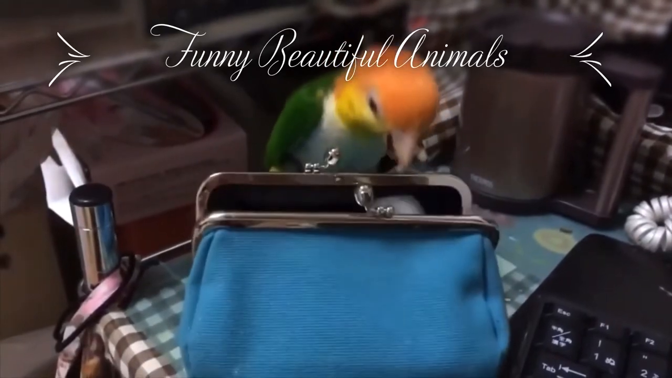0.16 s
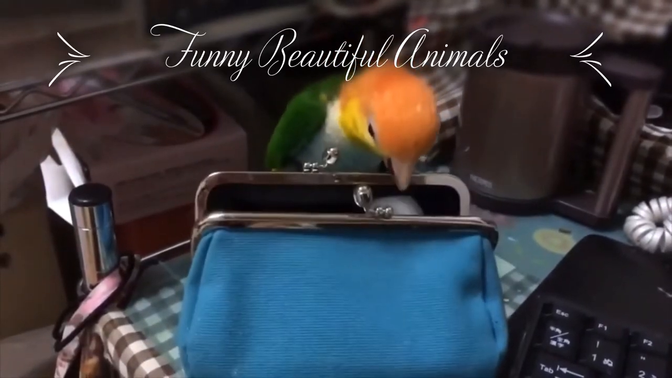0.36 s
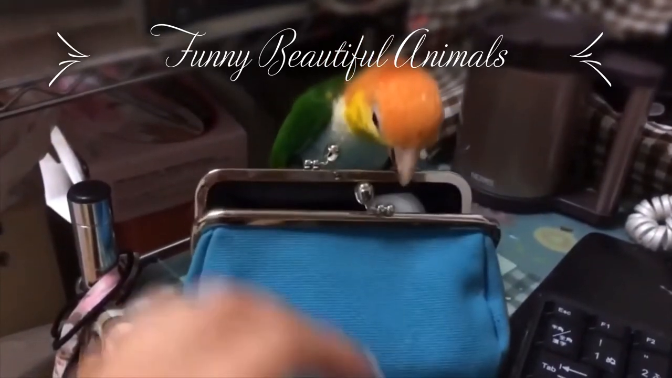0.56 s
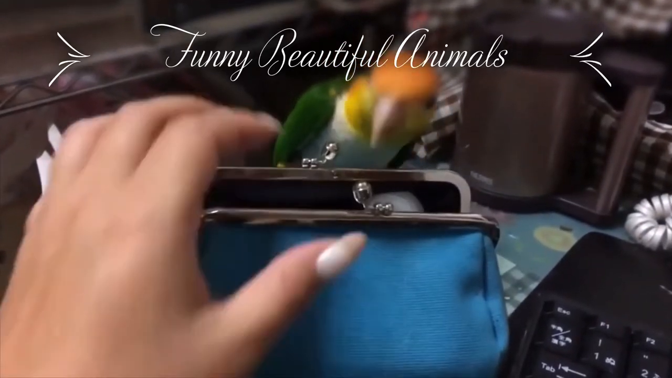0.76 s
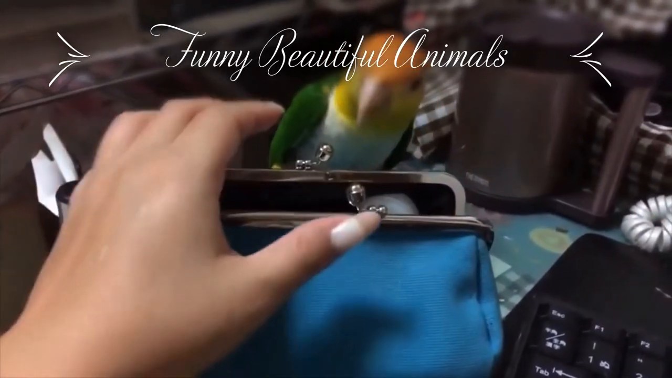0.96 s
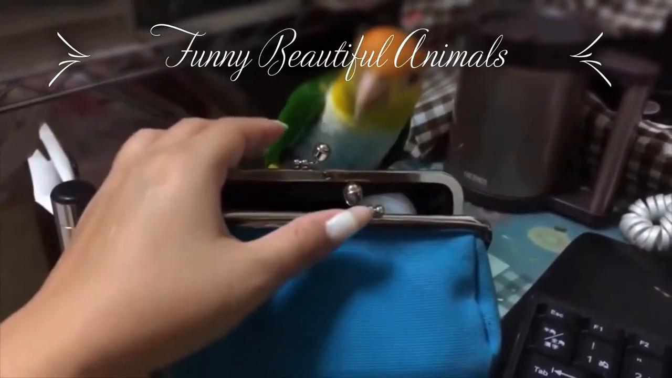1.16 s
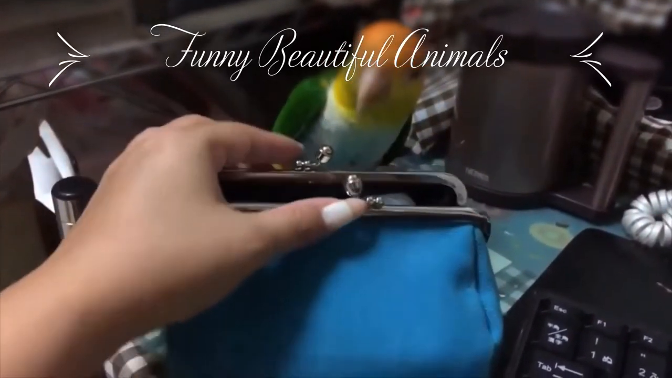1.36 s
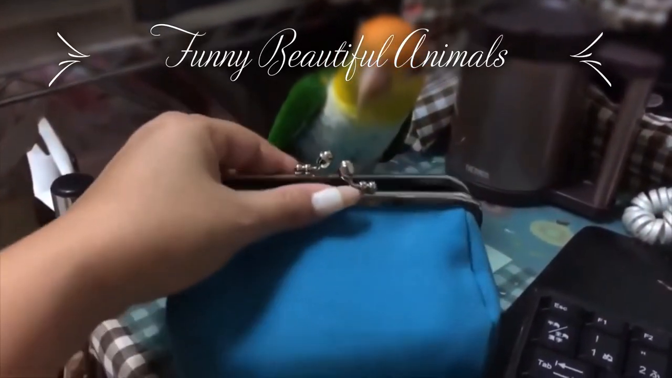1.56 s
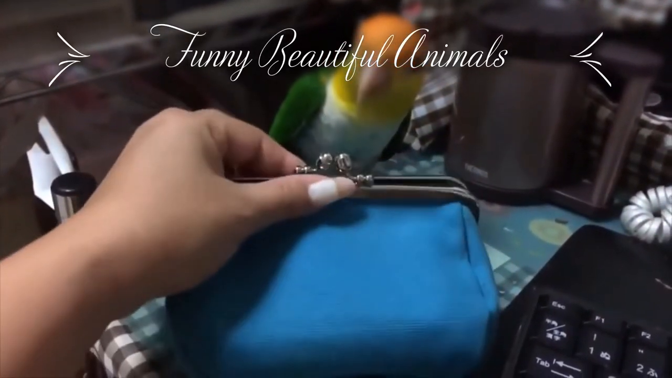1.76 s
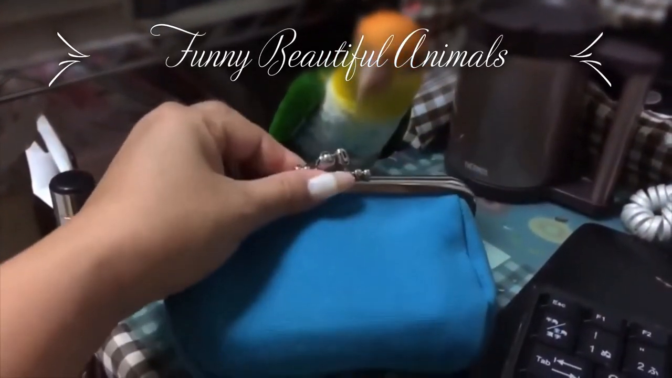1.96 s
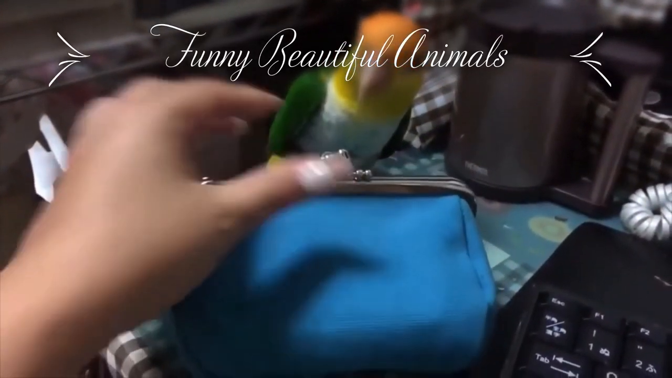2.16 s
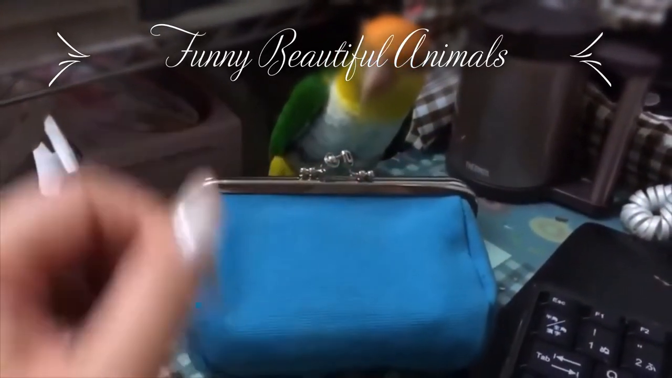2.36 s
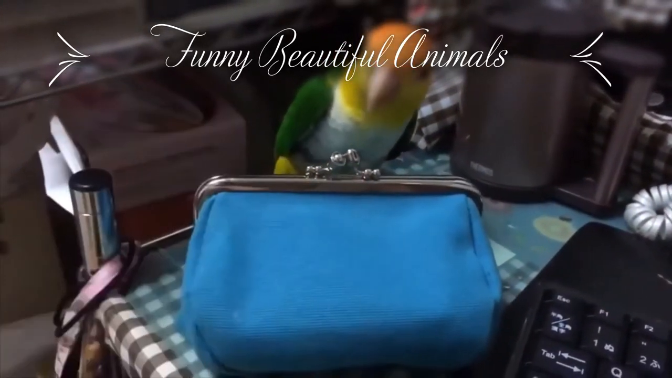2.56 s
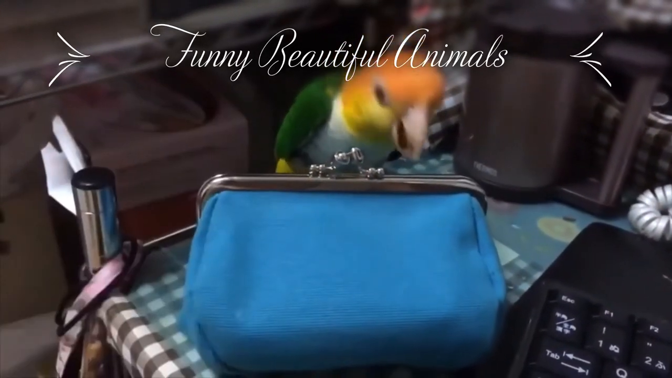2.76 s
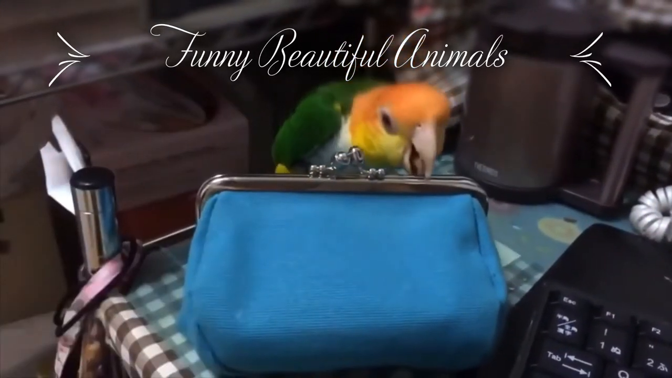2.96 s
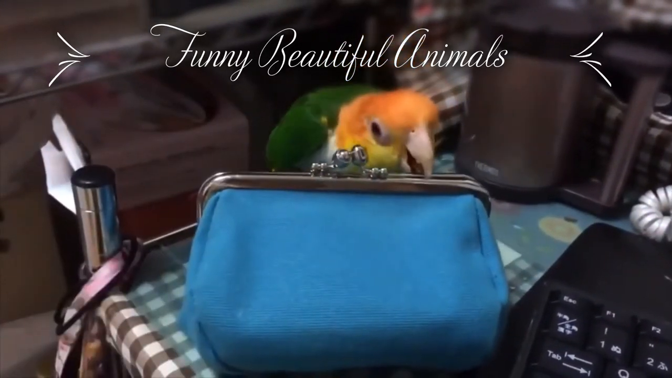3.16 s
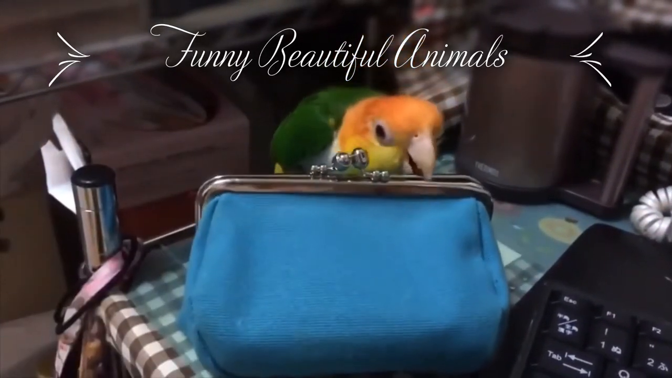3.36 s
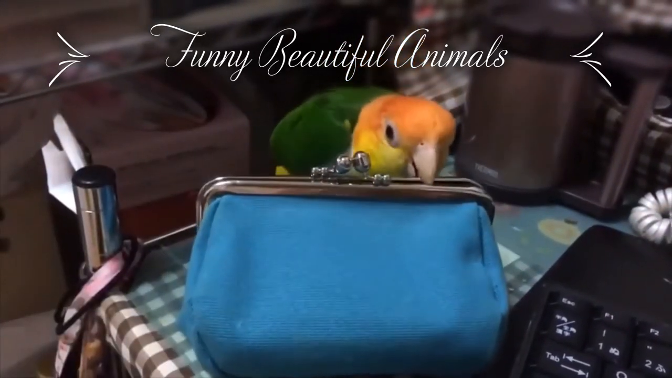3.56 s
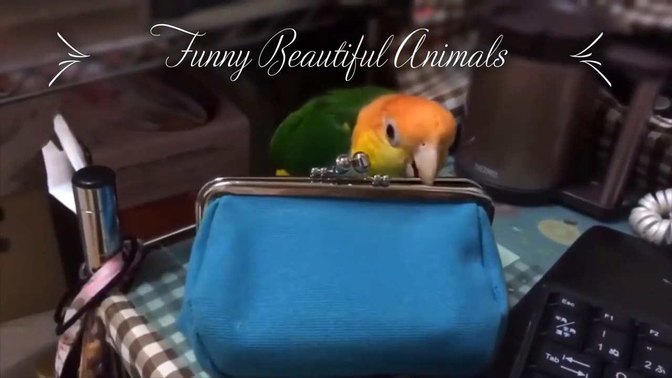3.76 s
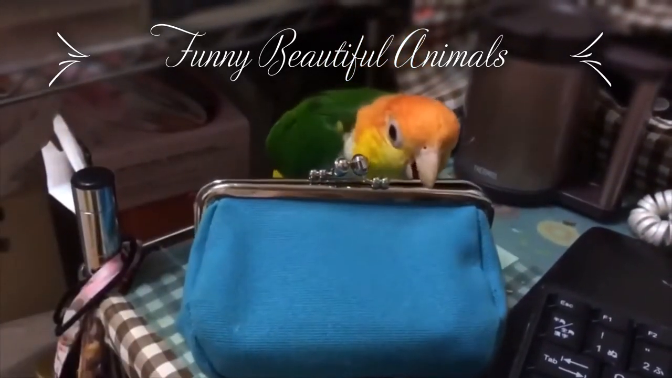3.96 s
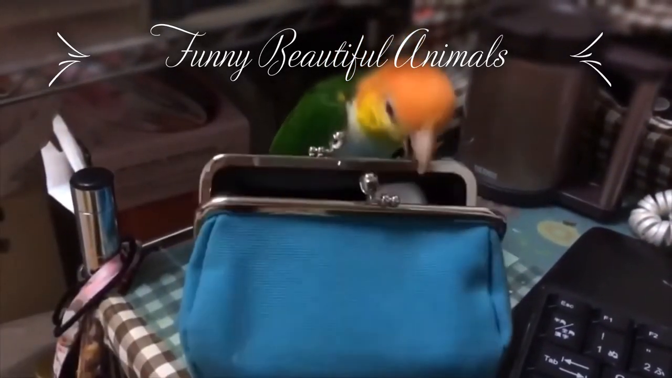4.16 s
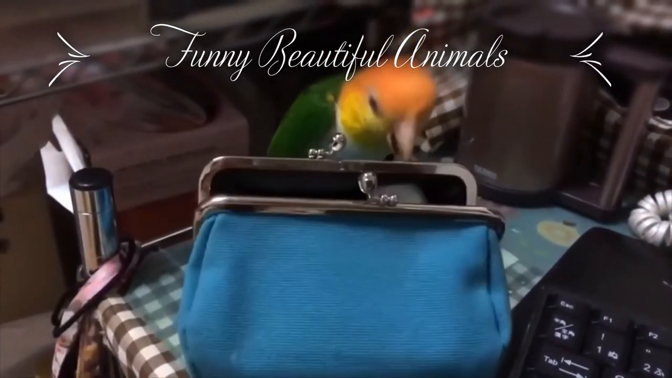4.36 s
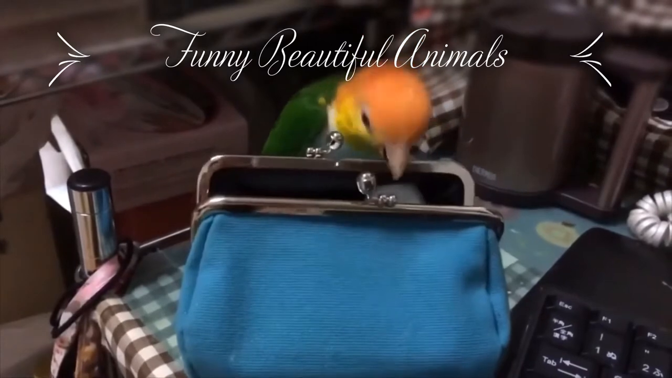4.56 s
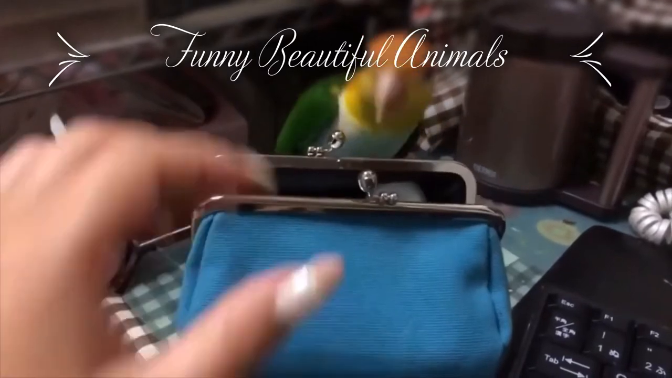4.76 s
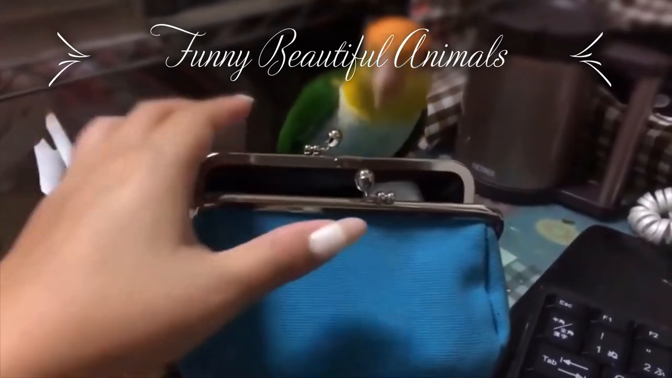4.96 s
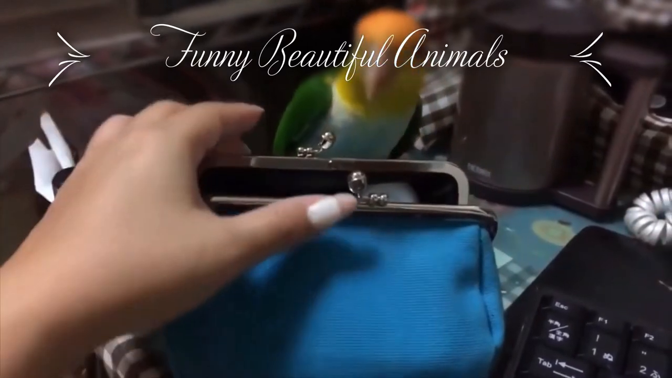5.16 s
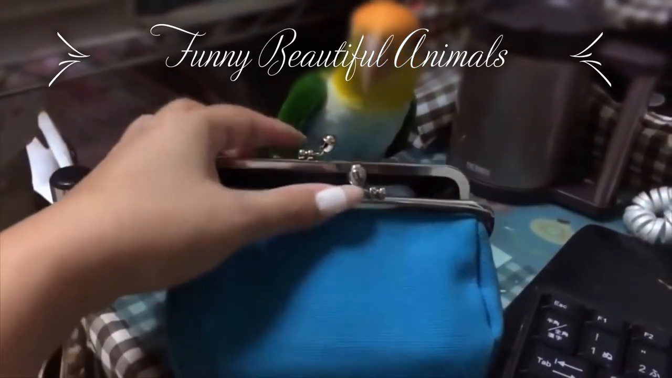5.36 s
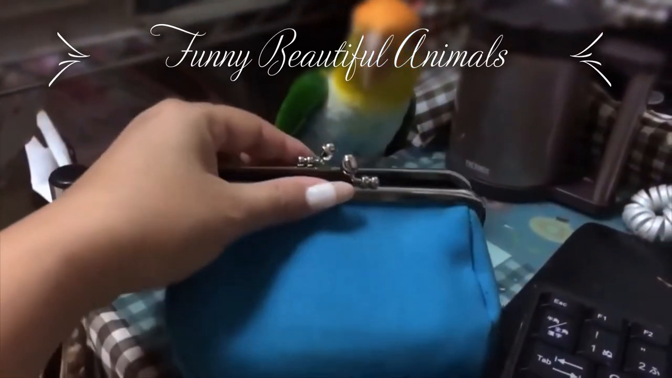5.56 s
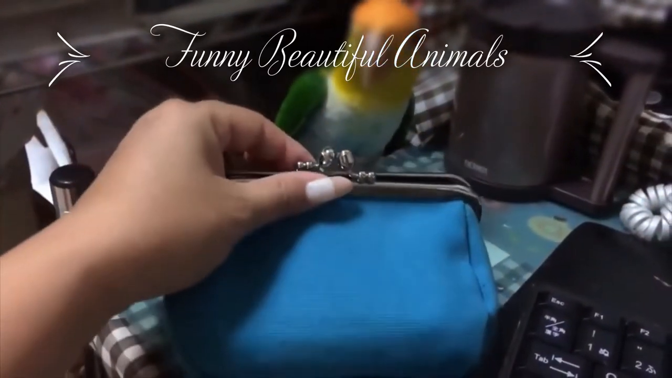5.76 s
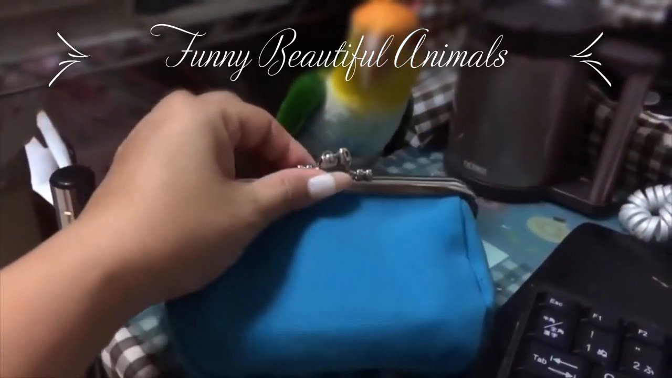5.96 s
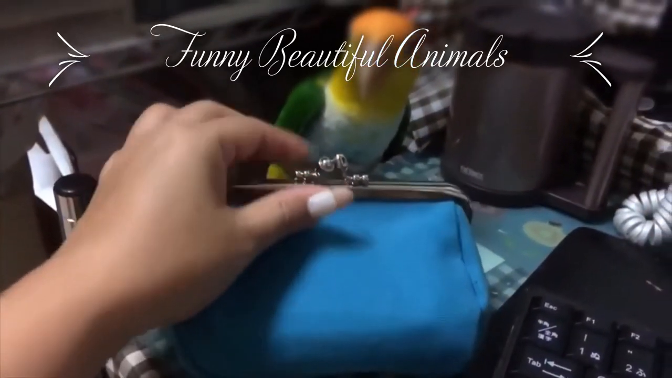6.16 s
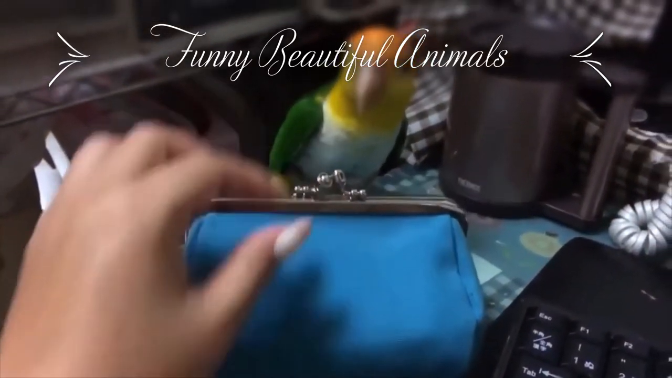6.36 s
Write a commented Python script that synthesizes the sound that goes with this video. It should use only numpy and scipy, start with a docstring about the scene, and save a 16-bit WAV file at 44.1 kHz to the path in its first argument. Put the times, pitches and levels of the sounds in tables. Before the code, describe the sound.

A small indoor space with very faint low hum, airy rush and soft hiss, heard close through one microphone that overloads slightly on peaks and dips the background after them. Light beak ticks on metal at about 0.4 and 0.65 s. At 0.8 s a parrot gives one short squawk, rising briefly then falling and roughening, about a tenth of a second. Cloth rubs softly and knobs touch at 1.7 s; at 1.93 s the clasp snaps shut, a loud bright crack with padded thud and short metallic ring. Small ticks and scuffs return around 2.95, 3.6 and 3.9 s. At 4.12 s the clasp springs open in a sharp rapid clatter, with a soft flop. Busy ticks run from 4.3 to 4.7 s. A thin, high, trilling chatter comes at 5.1-5.3 s, a knob click at 5.74 s, then a second loud ringing snap at 6.0 s, leaving faint hum.

```python
"""A small room with a mains hum and moving air: a parrot and a hand take turns at a purse's metal kiss-lock.
Twice the hand brings the knobs together and snaps them shut, each a filtered crack over ringing frame modes.
The beak ticks on the frame as shaped noise bursts, and in between the bird prises it open with a clatter.
As the hand comes near the bird squawks, later chatters: gliding harmonics through fixed throat resonances.
Padding and cloth answer with damped swings and grainy noise; one microphone overloads on loud sounds."""
import sys
import numpy as np
from scipy import signal
from scipy.fft import rfft, irfft
from scipy.io import wavfile

SR = 44100
rng = np.random.default_rng(int(sys.argv[2]) if len(sys.argv) > 2 else 0)


def master_out(mix):
    """Clip the mix to full scale and print it as 16-bit PCM to the path in sys.argv[1]."""
    frames = np.transpose(np.atleast_2d(mix))
    ceiling = np.clip(frames, -1, 1)
    pcm = np.round(ceiling * 32767).astype(np.int16)
    wavfile.write(sys.argv[1], SR, pcm)


N = 283122
TIME = np.arange(N) / SR  # s

# the clasp snaps shut: t/s, relative level/dB, relative frame ring/dB, body thud f/Hz
SNAP_EVENTS = [(1.9297, 3, -1, 580), (5.997, 3, 0, 410)]
# the knobs meet before a snap, two touches to each closing: t/s, relative level/dB
KNOB_TOUCHES = [(1.7172, -16), (1.9043, -23.5), (5.7377, -14), (5.9743, -25.5)]


def amp(db):
    """Decibels to gain."""
    return 10 ** (np.asarray(db) / 20)


def evened(x):
    """Scales to an rms of one."""
    return x / np.sqrt(np.mean(x ** 2) + 1e-20)


def unit(x):
    """Scales to an energy of one."""
    return x / np.sqrt(np.sum(x ** 2) + 1e-20)


def read(points, hz):
    """Reads a spectrum on a log-frequency axis."""
    f, value = np.transpose(points)
    return np.interp(np.log(hz + 1), np.log(f + 1), value)


def add(mix, s, sound):
    """Mixes a sound in from time s."""
    part = mix[round(s * SR):][:len(sound)]
    part += sound[:len(part)]


def noise(shape_db, size):
    """Noise of rms one whose spectrum follows a function of frequency."""
    gain = amp(shape_db(np.fft.rfftfreq(size, 1 / SR)))
    return evened(irfft(rfft(rng.standard_normal(size)) * gain, size))


def band_noise(hz, slope_db, size):
    """Noise in a rounded band about hz, slope_db down one octave away."""
    return noise(lambda f: -slope_db * np.log2((f + 1) / hz) ** 2, size)


def wander(rate, size):
    """Slow chance of rms one, up to about rate changes a second."""
    return noise(lambda f: -20 * np.log10(1 + (f / rate) ** 4), size)


def coloured(x, colour, tilt_db=0, size=4096):
    """Passes x through a causal minimum-phase filter of energy one, tilted in dB per octave above 500 Hz."""
    hz = abs(np.fft.fftfreq(size, 1 / SR))
    octaves = np.log2(np.maximum(hz, 500) / 500)
    log_gain = np.log(amp(np.maximum(read(colour, hz), -70) + tilt_db * octaves))
    response = np.exp(np.conj(signal.hilbert(log_gain)))
    taps = np.fft.ifft(response).real[:size // 2]
    return signal.fftconvolve(x, unit(taps))


def room(build=.008):
    """Sparse echoes that build up over the first milliseconds (build in s) and die band by band."""
    # time to die by 60 dB in the small room: f/Hz, t60/s
    decay_times = [(150, .16), (1000, .2), (2500, 0.2), (5000, 0.19), (12000, 0.15)]
    t = TIME[:SR // 2]
    sparse = rng.random(len(t)) < .12
    taps = rng.standard_normal(len(t)) * sparse * (1 - np.exp(-(t / build) ** 2))
    hz, at, bands = signal.stft(taps, SR, nperseg=128)
    dying = bands * amp(-60 * at / read(decay_times, hz)[:, None])
    return unit(signal.istft(dying, SR)[1])


def in_room(x, wet_db):
    """A sound together with its echoes."""
    return x + amp(wet_db) * signal.fftconvolve(x, room())[:N]


def air(rumble_db=-62, rumble_hz=95, rush_db=-65, hiss_db=-63.5, swell_db=0.46):
    """Low rumble, rush and soft hiss of moving air, three noise bands that swell together."""
    # spectrum of the rush: f/Hz, relative level/dB per Hz
    rush_colour = [(100, -36), (170, -10.5), (243, -3.5), (392, -7.5), (800, -13), (1040, -46.5),
                   (1760, -120)]
    # spectrum of the hiss: f/Hz, relative level/dB per Hz
    hiss_colour = [(410, -35.5), (700, -18), (875, -8), (971, -0.5), (1120, -2.5), (1360, -7), (1620, -7),
                   (1750, -10), (2100, -8.5), (2880, -18), (5260, -24.5), (7110, -24), (14400, -34),
                   (16000, -45)]
    rumble = amp(rumble_db) * band_noise(rumble_hz, slope_db=12.5, size=N)
    rush = amp(rush_db) * noise(lambda f: read(rush_colour, f), N)
    hiss = amp(hiss_db) * noise(lambda f: read(hiss_colour, f), N)
    return (rumble + rush + hiss) * amp(swell_db * wander(6.1, N))


def hum(motor_hz=57.7, buzz_hz=120, motor_db=0, buzz_db=-1, waver_rad=.18, flutter_db=1.8):
    """A motor turning just under the mains rate, magnetic buzz at twice that rate, faint wavering tones."""
    # the hum as the microphone's gain control leaves it, sinking after the snaps:
    # t/s, relative motor level/dB, relative mains buzz level/dB
    course = [(0.0, -60, -65), (0.45, -51, -60.5), (1.03, -58, -65), (1.91, -48, -55), (2.07, -63, -70),
              (2.63, -51.5, -58), (3.04, -62, -67), (3.22, -52, -58), (4.63, -51, -58), (4.67, -60, -68),
              (4.9, -46, -56), (5.17, -61.5, -68), (5.22, -52, -58), (5.93, -52, -66), (5.99, -46, -46),
              (6.1, -60, -73), (6.33, -51, -57), (6.42, -52, -61)]
    # steady faint tones: f/Hz, rms level/dB
    faint_tones = [(240, -70.5), (304, -74), (1112, -72.5), (1670, -77)]
    s, *levels = np.transpose(course)
    out = np.zeros(N)
    for hz, db, level_db in zip((motor_hz, buzz_hz), (motor_db, buzz_db), levels):
        swell = amp(np.interp(TIME, s, level_db) + db + flutter_db * wander(9, N))
        out += swell * np.sin(2 * np.pi * hz * TIME + waver_rad * wander(3.5, N))
    for hz, db in faint_tones:
        unsteady_time = TIME + .0003 * wander(5, N)
        out += amp(db) * np.sin(2 * np.pi * hz * unsteady_time)
    return np.sqrt(2) * out  # a sine's amplitude for the rms asked


def scuff(db, half, hz, slope_db=4.5, grain_db=3.5):
    """A brief, grainy rub of cloth, centred in one second; half is its half length in s."""
    rub = evened(band_noise(hz, slope_db, SR) * amp(grain_db * wander(200, SR)))
    return amp(db) * rub * np.exp(-((TIME[:SR] - .5) / half) ** 2)


def thump(db, hz, decay):
    """One damped swing of the padded body, dying over decay s."""
    t = TIME[:SR]
    return amp(db) * np.sin(2 * np.pi * hz * t) * np.exp(-t / decay)


def purse_body(squeeze_lead_s=.011, flop_s=4.146):
    """The soft body is squeezed, jolted by each snap, nudged by the knobs, and flops open on the table."""
    # fingers and beak scuff the cloth: t/s of the middle, level/dB, half length/s, centre f/Hz
    rubs = [(1.661, -62.5, .03, 820), (1.69, -53, .007, 780), (2.937, -50.5, .006, 440),
            (2.971, -51.5, 0.0036, 600), (4.203, -58, .006, 1800), (4.237, -62, .023, 400),
            (4.615, -52, .006, 2380), (4.698, -56, .008, 2600), (4.752, -66, .028, 5000),
            (4.763, -55, 0.028, 870), (5.674, -53, .008, 750)]
    to_middle = .5  # s from a scuff's start to its middle
    out = np.zeros(N)
    for s, _, _, thud_hz in SNAP_EVENTS:
        squeeze_s = s - squeeze_lead_s  # the fingers press the padding just before the frame snaps
        add(out, squeeze_s, thump(db=-34, hz=82, decay=0.03))
        add(out, squeeze_s - to_middle, scuff(db=-44.5, half=.0073, hz=380))
        add(out, squeeze_s - to_middle, scuff(db=-57, half=.006, hz=4500))
        add(out, s, thump(db=-27, hz=thud_hz, decay=.006))
        add(out, s, thump(db=-34, hz=125, decay=.009))
    for s, _ in KNOB_TOUCHES[::2]:  # the first, firmer touch of each closing
        add(out, s + 0.0043 - to_middle, scuff(db=-51, half=.0035, hz=1100))
    add(out, flop_s, thump(db=-28.5, hz=184, decay=.0088))
    add(out, flop_s + .007 - to_middle, scuff(db=-44, half=0.0092, hz=500))
    for s, db, half, hz in rubs:
        add(out, s - to_middle, scuff(db, half, hz))
    return in_room(out, wet_db=-14)


def syrinx(hz, rough, jitter=0.078, shimmer_db=4.0, rasp=0.42):
    """Harmonics of the bird's membranes; roughness shakes their pitch, brightens them and adds a rasp."""
    turns = np.cumsum(hz * np.exp(jitter * rough * wander(460, len(hz)))) / SR
    rolloff = 1.7 - 1.31 * rough
    tone = sum(np.cos(2 * np.pi * k * turns) / k ** rolloff
               for k in range(1, 6) if k * hz.mean() < SR / 3)
    puffs = rng.standard_normal(len(hz)) * (1 + np.cos(2 * np.pi * turns))
    shimmer = amp(shimmer_db * rough * wander(480, len(hz)))
    return evened((evened(tone) + rasp * rough * puffs) * shimmer)


def call(curve, clean_db, harsh_db, rough_low, rough_top, quaver=0.059, quaver_hz=105, quaver_db=3):
    """A gliding whistle that roughens and quavers more as its peak effort climbs from clean_db to harsh_db."""
    s, pitch, effort = np.transpose(curve)
    t = np.arange(s[0], s[-1], 1 / SR)
    hz, db = np.interp(t, s, pitch), np.interp(t, s, effort)
    peak_db = np.maximum.accumulate(db)  # once harsh, it stays harsh
    harshness = np.clip((peak_db - clean_db) / (harsh_db - clean_db), 0, 1)
    rough = rough_low + (rough_top - rough_low) * harshness
    shake = rough * np.sin(2 * np.pi * quaver_hz * t + wander(60, len(t)))
    voice = syrinx(hz * (1 + quaver * shake), rough)
    return s[0], amp(db - quaver_db * shake) * voice * signal.windows.tukey(len(t), .04)


def trill(length, db, rate, top_hz=2850, sag=.18, ends_db=-9, sharpness=1.8, rough=.72):
    """A swelling and fading run of pushes; the harder the push, the deeper the pitch dips."""
    t = np.arange(0, length, 1 / SR)
    swell = amp(ends_db * (2 * t / length - 1) ** 2)
    push = abs(np.sin(np.pi * rate * t)) ** sharpness
    hz = top_hz * (1 - sag * (push * swell) ** 2)
    return amp(db) * swell * push * syrinx(hz, rough, jitter=.03, shimmer_db=3, rasp=.25)


def parrot(level_db=1, trill_db=2.5):
    """One falling squawk, later a thin whistle joined by trills, all through fixed throat resonances."""
    # the squawk: t/s, pitch f/Hz, effort as relative level/dB
    squawk = [(.778, 2444, -66), (.812, 2773, -53.5), (.841, 2153, -47.5), (.849, 1857, -39),
              (.866, 1645, -39), (.879, 1623, -38), (.884, 1626, -44), (.897, 1620, -60)]
    # the whistle: t/s, pitch f/Hz, effort as relative level/dB
    whistle = [(5.06, 2800, -66), (5.105, 3390, -58), (5.14, 3160, -62), (5.195, 3200, -68),
               (5.222, 4115, -76), (5.262, 2846, -55), (5.30, 2795, -56), (5.313, 2830, -68.5)]
    # trills within the chatter: start t/s, length/s, relative level/dB, push rate/Hz
    trills = [(5.085, 0.018, -44, 156), (5.1153, 0.068, -49.5, 93), (5.252, .051, -46.5, 175)]
    # throat resonances: f/Hz, relative gain/dB
    throat = [(900, -13), (1700, -4.5), (2300, -7), (2950, -0.5), (3600, 2), (4100, -1.5), (4800, 3.5),
              (5500, 3), (6400, -14), (7600, -10), (8450, 1), (9300, -17), (15000, -28)]
    out = np.zeros(N)
    add(out, *call(squawk, clean_db=-57.5, harsh_db=-43, rough_low=0.17, rough_top=0.68))
    add(out, *call(whistle, clean_db=-70.5, harsh_db=-61, rough_low=0.53, rough_top=0.546))
    for s, length, db, rate in trills:
        add(out, s, trill(length, db + trill_db, rate))
    throat_gain = amp(level_db + read(throat, np.fft.rfftfreq(N, 1 / SR)))
    voice = irfft(rfft(out) * throat_gain, N)
    return in_room(voice, wet_db=-19.5)


def contact(decay, rattle):
    """One hard impact, then a dense dying rattle of the two surfaces (decay in s)."""
    t = TIME[:SR // 20]
    envelope = np.exp(-t / decay) * (1 - np.exp(-2 * t / decay))
    grains = unit(rng.standard_normal(len(t)) * envelope)
    return unit((t == 0) + rattle * grains)


def clicks(rows, colour, rattle, level_db, wet_db):
    """Small hard contacts, each with its own brightness and length."""
    out = np.zeros(N)
    for s, db, tilt_db, decay in rows:
        click = unit(coloured(contact(decay, rattle), colour, tilt_db))
        add(out, s, amp(db + level_db) * click)
    return in_room(out, wet_db)


def clasp(touch_decay=0.0019, touch_tilt_db=1.56):
    """Hard contacts of the beak on the frame, knobs springing open, and knobs meeting."""
    # the beak ticks on the frame: t/s, relative level/dB, tilt/dB per octave, decay/s
    ticks = [(.3795, -46, -2, .002), (.4333, -42.5, 5.5, 0.00089), (.629, -50, 10, 0.0011),
             (.6818, -49, 1, 0.0013), (2.935, -41.5, 1, 0.0036), (2.969, -34.5, 3, 0.0019),
             (3.0503, -44.5, 2, .002), (3.5895, -46, 0, .0035), (3.8655, -49, 3, .002),
             (3.8983, -38, -3, 0.0025), (4.3245, -41.5, 4.5, 0.0011), (4.4656, -35, 4, 0.0016),
             (4.5055, -42.5, 2, 0.0018), (4.5653, -34.5, 5, .0012), (4.6155, -29.5, 0.5, .003),
             (4.6995, -35.5, -1, 0.0044)]
    # the knobs slip past each other, spring open and clatter: columns as for the ticks
    slips = [(4.1212, -34, -4, .003), (4.1239, -15.5, 1.5, .0022), (4.1261, -10, 3, 0.0013),
             (4.129, -18, -1, 0.004), (4.142, -29, 1, 0.0017), (4.1755, -36.5, -2, 0.0033)]
    # spectra of beak, slipping knobs and meeting knobs: f/Hz, relative level/dB per Hz
    beak_colour = [(410, -70), (700, 0), (958, -1), (1280, -5.5), (2430, 5.5), (3640, -3.5), (4100, 0.5),
                   (4490, -1.5), (12500, -21.5), (14400, -26), (16000, -35)]
    slip_colour = [(88, -47), (150, -8), (309, -16), (578, -3), (1060, -2), (1360, -10), (2180, -2),
                   (2980, -12), (3420, -1.5), (4300, -6.5), (6390, -15.5), (7500, -10.5), (8900, -20.5),
                   (14500, -25.5), (16000, -37)]
    knob_colour = [(180, -41), (300, -12.5), (624, -19.5), (1360, -4.5), (2070, -20), (4020, -2.5),
                   (4670, -8), (5160, 1), (6100, -14.5), (9550, -11.5), (12100, -28), (13800, -24),
                   (16000, -46.5)]
    touches = [(s, db, touch_tilt_db, touch_decay) for s, db in KNOB_TOUCHES]
    return (clicks(ticks, beak_colour, rattle=1.3, level_db=8, wet_db=-12.5)
            + clicks(slips, slip_colour, rattle=1.44, level_db=9, wet_db=-17)
            + clicks(touches, knob_colour, rattle=0.59, level_db=7, wet_db=-18.0))


def snaps(crack_db=8, echo_db=0.0, ring_db=-1, decay=.0014, rattle=1.055, echo_build=0.0079,
          ring_build=0.016, ring_t60=.145, uneven_db=1.2):
    """The frame halves slam together: a crack, the uneven ring of the metal and the room's answer."""
    # spectra of the crack and of its echo: f/Hz, relative level/dB per Hz
    crack_colour = [(100, -33.5), (170, -4), (800, -3), (1250, -5), (2100, -4), (2440, -5.5), (2780, -12.5),
                    (3430, 0.5), (4830, -8), (5520, -13.5), (6800, -11.5), (7200, -7), (9950, -9),
                    (10500, -10.5), (11600, -10), (14500, -19), (16000, -24.5)]
    echo_colour = [(59, -35.5), (100, -10.5), (166, -21), (513, -17.5), (691, -13), (818, -24), (970, -8),
                   (1580, -12.5), (2220, -3.5), (2800, -14.5), (3470, -7.5), (6700, -14), (11200, -12.5),
                   (14700, -18), (16000, -37)]
    # ringing modes of the metal frame: f/Hz, relative level/dB
    modes = [(426, -14.5), (980, -12.5), (1357, -9), (2051, -10), (2137, -5.5), (2215, -3.5), (2286, -1),
             (2405, -2.5), (2440, -1), (2678, -9), (3400, -1), (3518, -4), (4150, -8), (5130, -11),
             (7400, -13.5), (8514, -7), (8787, -7), (9518, -11.5), (11051, -7), (11230, -10.5)]
    out, t = np.zeros(N), TIME[:SR // 3]
    for s, db, frame_db, _ in SNAP_EVENTS:
        ring = np.zeros(len(t))
        for hz, level in modes:
            # each mode's level wanders at random, for an uneven ring
            swell = amp(level + uneven_db * wander(50, len(t)))
            ring += swell * np.sin(2 * np.pi * (hz * t + rng.random()))
        ring *= np.exp(-np.log(1000) * t / ring_t60) * (1 - np.exp(-t / ring_build))
        crack = unit(coloured(contact(decay, rattle), crack_colour))
        echo = unit(coloured(room(echo_build), echo_colour))
        add(out, s, amp(db + crack_db) * crack)
        add(out, s, amp(db + frame_db + ring_db) * unit(ring))
        add(out, s, amp(db + echo_db) * echo)
    return out


def scene():
    """Everything at one microphone."""
    return (air() + hum() + purse_body() + parrot() + clasp() + snaps())[None]


def record(dry, threshold_db=-24, fall_db_per_s=14, share=0.47, edge_hz=15900):
    """Gain control ducks a share of any excess and eases back; then soft overload and the band limit."""
    power_db = 10 * np.log10(signal.lfilter([.002], [1, -.998], dry[0] ** 2) + 1e-12)
    fall = TIME * fall_db_per_s
    held_db = np.maximum.accumulate(power_db + fall) - fall  # peaks held, then falling steadily
    over_db = np.maximum(held_db - threshold_db, 0)
    ducked = dry / amp(share * signal.lfilter([.005], [1, -.995], over_db))
    limited = .9 * np.tanh(ducked / .9)
    low_pass = signal.firwin(255, edge_hz, window=("kaiser", 8), fs=SR)
    return signal.oaconvolve(limited, low_pass[None], "same")


dry = scene()
out = record(dry)
master_out(out)
```